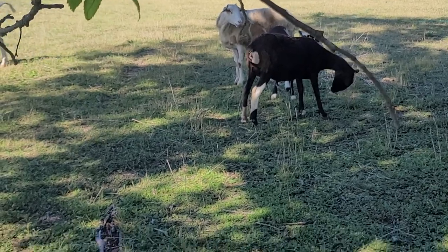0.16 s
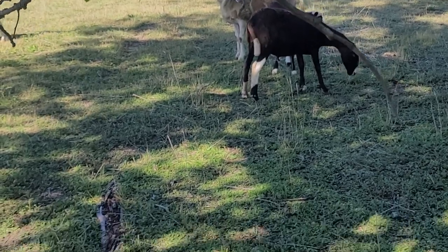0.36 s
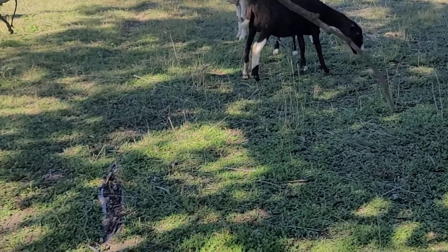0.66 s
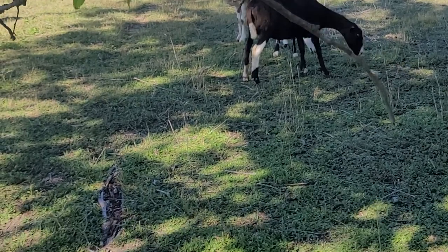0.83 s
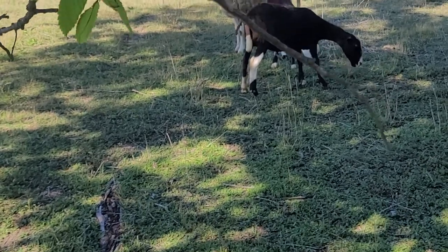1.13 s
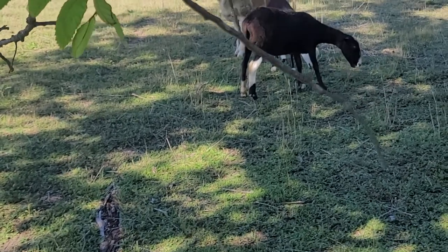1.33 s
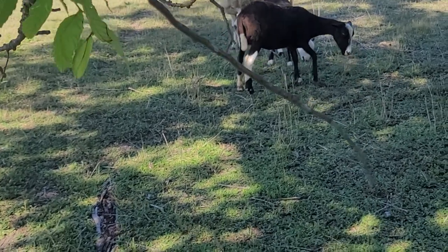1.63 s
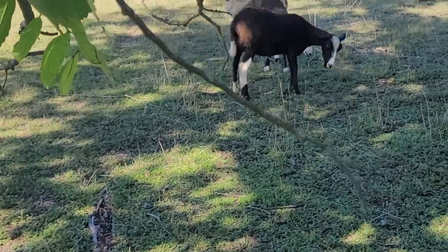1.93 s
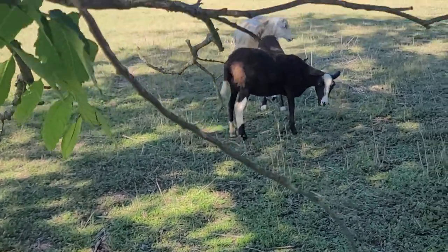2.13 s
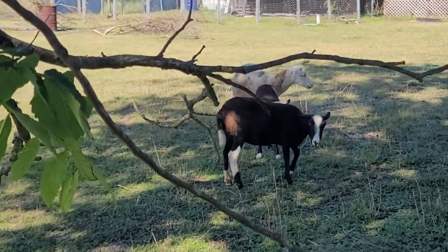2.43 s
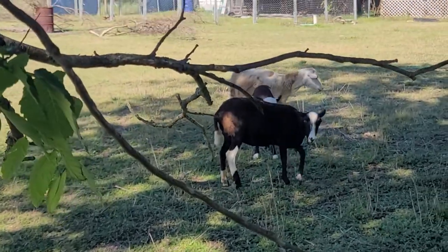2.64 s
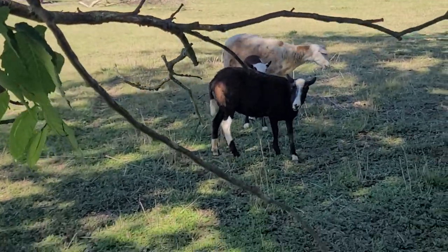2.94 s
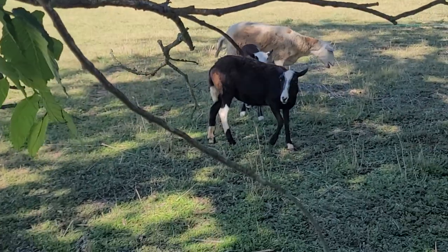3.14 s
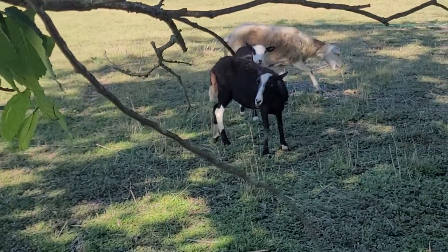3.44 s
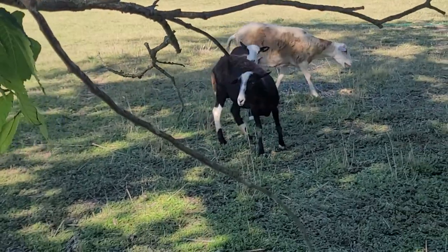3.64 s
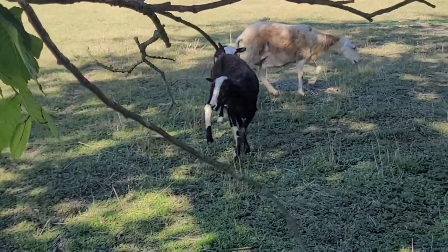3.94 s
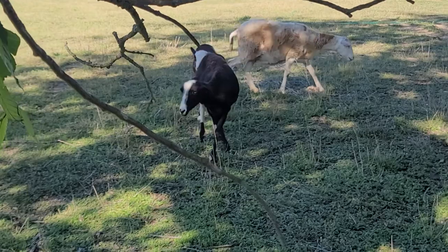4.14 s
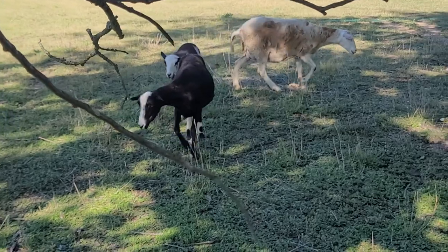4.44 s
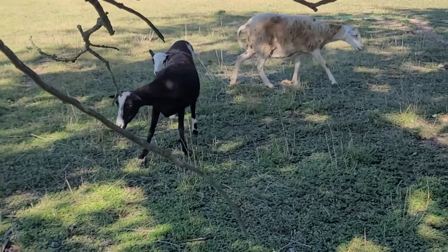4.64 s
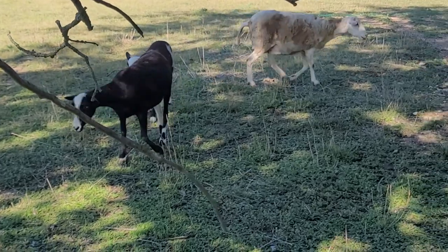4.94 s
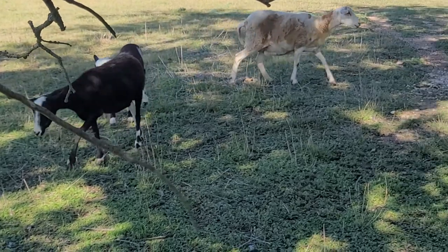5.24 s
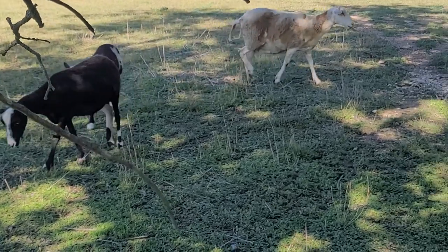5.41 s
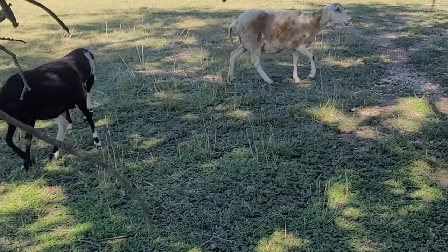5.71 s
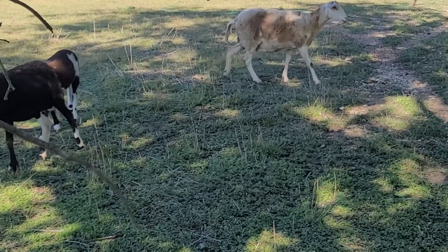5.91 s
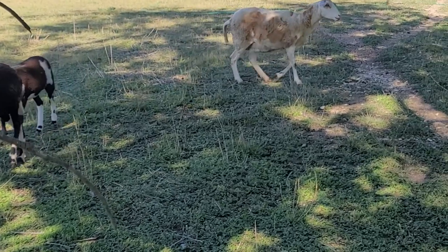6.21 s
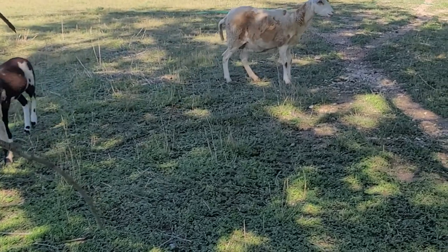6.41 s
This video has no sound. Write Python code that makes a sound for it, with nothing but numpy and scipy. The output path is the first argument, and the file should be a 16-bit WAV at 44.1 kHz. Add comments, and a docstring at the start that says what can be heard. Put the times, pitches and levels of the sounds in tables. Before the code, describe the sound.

An open pasture heard through a handheld stereo microphone: deep wind buffeting, soft far noise and a faint wavering low drone. From 0 to 1.4 s small birds give thin whistles, first a steady one, then a high cluster around 1.0 to 1.4 s. Wind gusts thump briefly, strongest near 2.5 s; a dry stalk snaps at 1.8 s. At 3.2 s a fairly near sheep bleats once until 3.8 s, low, nasal and raspy, quavering nearly twenty times a second, opening brighter, slowing slightly and stopping with airy rasp. Stalks crackle from 3.8 to 5.6 s. From 4.4 s high whistles return, rising and buzzing, mostly left. A far crow caws hoarsely and faintly at 5.4, 5.8 and 6.2 s. From 5.7 to 6.5 s a fast trill of steep falling chirps echoes in trees above growing distant twitter, and a last buzzy whistle ends it.

```python
"""Birds whistle over wind rumble, far noise and a faint drone; dry stalks snap as decaying noise throughout.
At 3.2 s a sheep bleats for 0.65 s: quavering glottal pulses and air ring a throat whose mouth opens.
More gliding-sine whistles follow, a far crow caws hoarsely through one resonance from 5.4 s,
and from 5.7 s a trill of steep downward sweeps echoes in the trees over a growing far chorus."""
import sys
import numpy as np
from scipy import signal
from scipy.fft import rfft, irfft, next_fast_len
from scipy.io import wavfile
from scipy.ndimage import uniform_filter1d, map_coordinates

SR = 44100
rng = np.random.default_rng(int(sys.argv[2]) if len(sys.argv) > 2 else 0)


def wav_record(signal):
    """Record a signal, one row per channel, as 16-bit PCM in the file named by sys.argv[1]."""
    frames = np.transpose(np.atleast_2d(signal))
    bounded = np.clip(frames, -1, 1)
    # unit amplitude maps onto the largest positive 16-bit level
    quanta = np.round(bounded * 32767).astype(np.int16)
    wavfile.write(sys.argv[1], SR, quanta)


N = 289737
T = np.arange(N) / SR
SIZE = 2 * next_fast_len(N // 2 + 1, True)
HZ = np.maximum(np.arange(SIZE // 2 + 1) * SR / SIZE, 1)

BLEAT_START_S, BLEAT_END_S = 3.158, 3.806
SLACK_DB = -27.5  # source level with no effort
CHIRP_S = .04  # call length of far birds


def undb(db):
    """Decibels to gain."""
    return 10 ** (np.asarray(db) / 20)


def unit(x):
    """Scale to rms 1."""
    return x / np.sqrt(np.mean(x ** 2))


def curve(rows):
    """Rows (s, value) joined by straight lines."""
    return np.interp(T, *np.transpose(rows))


def bumps(rows):
    """Sum of Gaussian rises: start of each row is its centre (s, length s, rise)."""
    return sum(rise * np.exp(-((T - at) / length) ** 2) for at, length, rise in rows)


def pan_gains(pan_db):
    """Left and right gains for a left-minus-right level."""
    return undb(np.array([[pan_db], [-pan_db]]) / 2)


def walk(rate_hz):
    """Smooth random signal with a spread near 1."""
    k = int(SR / rate_hz)
    steps = np.repeat(rng.standard_normal(N // k + 1), k)
    return 1.321 * uniform_filter1d(uniform_filter1d(steps, k), k)[:N]


def noise(spectrum, share=1):
    """Noise of rms 1 coloured by (Hz, dB) points, of which a share of the power is kept."""
    hz, db = np.transpose(spectrum)
    gain = undb(np.interp(np.log(HZ), np.log(hz), db, left=-120, right=-120))
    return irfft(rfft(rng.standard_normal(SIZE)) * unit(gain) * np.sqrt(share))[:N]


def resonate(x, modes):
    """Ring resonances (Hz, width Hz, dB); the folded cepstrum makes the response causal."""
    hz = np.linspace(0, SR / 2, 4097)
    gain = sum(undb(db) / (1 + (2 * (hz - centre) / width) ** 2) for centre, width, db in modes)
    cepstrum = irfft(np.log(gain))
    cepstrum[1:len(hz)] *= 2
    cepstrum[len(hz):] = 0
    return signal.oaconvolve(x, irfft(np.exp(rfft(cepstrum))))[:N]


def flex(x, modes, scale):
    """Move all resonances by a changing factor: ring them on a warped clock, then unwarp."""
    clock, samples = np.cumsum(scale), np.arange(N)
    warped = map_coordinates(x, [np.interp(samples, clock, samples)])
    return map_coordinates(resonate(warped, modes), [clock])


def dip(x, notches):
    """Antiresonances (Hz, width Hz, dB) darken the valleys of a sound."""
    for hz, width, db in notches:
        x = x - (1 - undb(db)) * signal.lfilter(*signal.iirpeak(hz, hz / width, fs=SR), x)
    return x


def place(x, pan_db, lag_ms):
    """Two ports: the left one hears the sound lag_ms later."""
    left = np.roll(x, int(round(lag_ms * SR / 1000)))
    return np.array([left, x]) * pan_gains(pan_db)


def scatter(x, t60_s):
    """Diffuse echoes from grass, trunks and leaves: decaying noise, different at each port."""
    t = T[:SR]
    tail = rng.standard_normal((2, SR)) * undb(-60 * t / t60_s) * (1 - np.exp(-t / .004))
    tail /= np.sqrt(np.sum(tail ** 2) / 2)
    return signal.fftconvolve(np.atleast_2d(x), tail, axes=1)[:, :N]


def glide(hz):
    """A sine that follows a pitch, swelling and fading over its length."""
    return np.sin(2 * np.pi * np.cumsum(hz) / SR) * np.hanning(len(hz)) ** .45


def quaver():
    """Pitch, level and throb of the bleat: pitch and level follow effort and surge at each throb."""
    # push behind the bleat: time_s, effort_0_to_1, quaver_depth_0_to_1
    push = [(3.16, .35, .2), (3.195, .45, .4), (3.225, .66, 1), (3.28, .75, .75), (3.38, .92, 1),
            (3.45, .9, .6), (3.53, 1, .15), (3.6, .8, .3), (3.68, .4, 1), (3.77, .4, 1), (3.806, 0, .6)]
    slack_hz, push_hz, push_db = 130.94, 30.72, 12  # pitch without effort; what full effort adds
    fresh_per_s, tired_per_s = 19.7, 14.6  # throbs a second
    crest_s, tires_s = 3.222, 3.626  # first full throb; moment the quaver slows
    swing_share, swing_db, sharpness = .12, 2.9, 2.5  # swings at full depth
    attack_s, attack_db, release_s, release_db = .008, 6, .024, 9
    times, effort, depth = np.transpose(push)
    effort, depth = np.interp(T, times, effort), np.interp(T, times, depth)

    turns = fresh_per_s * (np.minimum(T, tires_s) - crest_s) + tired_per_s * np.maximum(T - tires_s, 0)
    surge = 2 * np.abs(np.cos(np.pi * turns)) ** sharpness - 1
    throb = surge * np.clip((T - BLEAT_START_S) / (crest_s - BLEAT_START_S), 0, 1)
    hz = (slack_hz + push_hz * effort) * (1 + swing_share * (1 + depth) / 2 * throb)
    starting = np.clip(1 - (T - BLEAT_START_S) / attack_s, 0, 1)
    fading = np.clip(1 - (BLEAT_END_S - T) / release_s, 0, 1)
    db = SLACK_DB + push_db * effort + swing_db * depth * throb
    return hz, db - attack_db * starting - release_db * fading, throb


def glottis(hz, db, sounding, soft_hz=3800):
    """Uneven vocal-fold pulses, each followed by a decaying puff of air; returns source and puffs."""
    jitter_share, shimmer_db, rasp_db = .022, 1.1, -16
    cycles = np.cumsum(hz * (1 + jitter_share * walk(150)) * sounding) / SR
    beats = np.interp(np.arange(int(cycles[-1]) + 1) + 1e-6, cycles, np.arange(N))
    sizes = undb(shimmer_db * rng.standard_normal(len(beats)))
    pulses = np.zeros(N)
    for at, size in zip(beats, sizes):
        near = int(at) + np.arange(-8, 9)  # windowed sinc places the pulse between samples
        pulses[near] += size * np.sinc(near - at) * np.hanning(len(near))
    pulses *= np.sqrt(SR / np.mean(hz))
    puffs = np.exp(-(cycles % 1) / .6) * sounding
    rasp = undb(rasp_db) * 2 * puffs * rng.standard_normal(N)
    # soft fold closure leaves the top octaves to turbulence
    lowpass = signal.butter(2, soft_hz, fs=SR, output="sos")
    return signal.sosfilt(lowpass, (pulses + rasp) * undb(db)), puffs


def throat(source, mouth, throb, sounding, voice_db=15):
    """Throat and muzzle resonances crossfade from shut to open mouth and move with each throb."""
    # resonances, mouth nearly shut and wide open: centre_hz, width_hz, rel_db
    shut_modes = [(486, 110, -27), (705, 310, -43), (1406, 54, -16), (1630, 150, -14), (1855, 147, 0.5),
                  (2120, 100, -7), (2164, 66, 3.5), (2980, 450, -16.5), (3650, 120, -11),
                  (5900, 2000, -25.5)]
    open_modes = [(486, 82, -18), (671, 126, -12), (754.3, 36, -11.5), (1724, 81, -13.5), (1835, 114, -6.5),
                  (2010, 64, -17), (2220, 176, -3.5), (2366, 98, -4), (2610, 90, -16), (2753, 212, -8),
                  (3087, 78, -13), (5900, 420, -32.5)]
    # valleys of the open mouth: centre_hz, width_hz, gain_db
    valleys = [(1080, 210, -4), (1470, 200, -7), (4400, 910, -9)]
    # nasal resonances until the lips part: centre_hz, width_hz, rel_db
    nose_modes = [(1980, 400, 4), (3680, 390, 1), (6000, 1500, -3)]
    swing_share, wander_share = .011, .011
    rise_share, rise_s, lips_part_s = .035, .06, .043  # resonances start low and settle
    slack = rise_share * np.exp(-np.abs(T - BLEAT_START_S) / rise_s)
    scale = 1 + (swing_share * throb + wander_share * walk(110) - slack) * sounding
    shut = flex(source * (1 - mouth), shut_modes, scale)
    opened = dip(flex(source * mouth, open_modes, scale), valleys)
    voice = undb(voice_db) * (shut + opened)
    parted = np.clip((T - BLEAT_START_S) / lips_part_s, 0, 1) ** 2
    return voice * parted + resonate(voice * (1 - parted), nose_modes)


def teeth_hiss(puffs, db, mouth, hiss_db=-54, open_db=6):
    """Air hisses past the teeth once a cycle, more as the mouth opens and as rasp breaks through."""
    # hiss colour: freq_hz, rel_db
    teeth = [(3000, 7), (3900, -7), (4900, -8.5), (5600, 1.5), (6800, -4), (7700, -12), (9200, -22),
             (10200, -15.5), (11200, -26), (15500, -26)]
    # rasp on some throbs: centre_s, length_s, rise_db
    rasps = [(3.228, 0.0098, 5), (3.328, .01, 0), (3.442, .008, 1), (3.565, 0.025, 4), (3.797, .022, 9.5)]
    puff_sharpness, flicker_db = .5, 1.6
    follow_db_per_db = .63  # hiss rise per dB of voice
    flicker = undb(flicker_db * (walk(70) + walk(600)))
    turbulence = np.array([noise(teeth), 1.2 * noise(teeth)]) * flicker
    level_db = follow_db_per_db * (db - SLACK_DB) + hiss_db + open_db * mouth + bumps(rasps)
    return turbulence * puffs ** puff_sharpness * undb(level_db)


def sheep(ground_db=-8, ground_ms=1.93, near_db=-9, echo_db=-24, echo_t60_s=.5):
    """Glottal pulses ring the throat as the mouth opens; turf inverts and returns the voice."""
    # jaw: time_s, opening_0_to_1
    jaw = [(3.16, 0.56), (3.225, 0.41), (3.28, 0.63), (3.37, 0.76), (3.45, 0.83), (3.55, 0.82),
           (3.63, 0.84), (3.7, 0.83), (3.78, 0.71)]
    hz, db, throb = quaver()
    sounding = (T > BLEAT_START_S) & (T < BLEAT_END_S)
    mouth = np.clip(curve(jaw), 0, 1)
    source, puffs = glottis(hz, db, sounding)
    voice = place(throat(source, mouth, throb, sounding), -1.2, .045)
    # soft turf swallows the hiss
    voice = voice - undb(ground_db) * np.roll(voice, int(ground_ms * SR / 1000), axis=1)
    voice = voice + teeth_hiss(puffs, db, mouth)
    return voice + undb(near_db) * scatter(voice, .17) + undb(echo_db) * scatter(voice, echo_t60_s)


def trill(bough_ms=12, bough_t60_s=.092, bough_db=-10, echo_db=-13, echo_t60_s=.95, pan_db=-7.5):
    """A rising pip and a steep downward sweep, about twelve times a second, slowing; trees echo it."""
    # syllables: crest_s, rel_db
    syllables = [(5.679, -32.5), (5.764, -35.5), (5.847, -35), (5.93, -33), (6.017, -33.5), (6.103, -35.5),
                 (6.188, -34.5), (6.275, -37), (6.361, -35.5), (6.453, -35.5)]
    # one falling syllable: time_from_crest_s, pitch_hz, rel_db
    fall = [(-.015, 6500, -24), (-.011, 5850, -6), (-.006, 5340, -7), (0, 5070, 0), (.004, 4850, -2),
            (.008, 4480, -19), (.016, 3950, -15), (.023, 3750, -26)]
    detune_share, steepness_share, flutter_db = .008, .11, 1.8  # random spreads
    pip_hz, pip_rise_share, pip_s, pip_lead_s, pip_db = 3370, .07, .009, .038, -51
    echo_evenness = .5  # power that flattens the swell sent to the trees
    song, spread = np.zeros(N), np.zeros(N)
    ages, pitches, levels = np.transpose(fall)
    age = np.arange(ages[0], ages[-1], 1 / SR)
    sweep_hz, swell = np.interp(age, ages, pitches), undb(np.interp(age, ages, levels))
    crest_hz = np.interp(0, ages, pitches)
    pip_slope = pip_rise_share * np.linspace(-.5, .5, int(pip_s * SR))
    chances = rng.standard_normal((len(syllables), 4))
    for (crest_s, db), (detune, steep, pip_pitch, pip_size) in zip(syllables, chances):
        hz = crest_hz * (1 + detune_share * detune)
        hz = hz + (sweep_hz - crest_hz) * (1 + steepness_share * steep)
        tone = glide(hz) * undb(db)
        pip = glide(pip_hz * (1 + 2 * detune_share * pip_pitch + pip_slope))
        at, pip_at = int((crest_s + ages[0]) * SR), int((crest_s - pip_lead_s) * SR)
        song[at:at + len(hz)] += tone * swell
        spread[at:at + len(hz)] += tone * swell ** echo_evenness
        song[pip_at:pip_at + len(pip)] += pip * undb(pip_db + pip_size)
    direct = place(song * undb(flutter_db * walk(250)), pan_db, .023)
    # nearby boughs blur each sweep; farther trees leave a haze over its range
    spread = place(spread, pan_db / 2, 0)
    boughs = np.roll(scatter(spread, bough_t60_s), int(bough_ms * SR / 1000), axis=1)
    return direct + undb(bough_db) * boughs + undb(echo_db) * scatter(spread, echo_t60_s)


def whistles(echo_db=-3.5, buzz_hz=260, waver_db=1.8, settle_power=2.26):
    """Near-sine notes glide fast, then settle; a fast flutter of the pitch turns some into buzzes."""
    # notes: start_s, length_s, first_hz, last_hz, rel_db, buzz_depth_hz, left_minus_right_db
    notes = [(0, .15, 2690, 2647, -54.5, 14, -10.5), (.408, 0.024, 3970, 4010, -67, 15, -6),
             (0.591, 0.037, 3040, 3100, -60.5, 70, -3), (.95, 0.022, 2550, 2650, -63, 20, -5),
             (1.036, 0.028, 3190, 3020, -56.5, 44, -3), (1.028, 0.15, 4750, 4395, -53.5, 44, -5),
             (1.18, 0.056, 2830, 2680, -63, 34, -1), (1.227, 0.039, 4660, 4350, -55, 30, -3),
             (1.255, 0.045, 4600, 4250, -50, 36, -3), (1.28, 0.068, 4310, 4450, -52, 20, -1),
             (1.341, 0.053, 4460, 4204, -52, 72, -3), (4.36, 0.15, 4880, 4430, -57, 81, -5),
             (4.469, 0.43, 4450, 4520, -60.5, 88, -3), (4.441, 0.073, 5480, 6270, -47, 55, -11),
             (4.763, 0.078, 5470, 6280, -46, 55, -9), (4.992, 0.13, 3415, 3314, -44.5, 36, -3),
             (5.02, 0.033, 2460, 2720, -52.5, 33, -4), (5.231, 0.21, 5560, 5680, -51, 200, -7.5),
             (5.25, 0.14, 6850, 6950, -65, 120, -8), (5.365, 0.08, 5180, 5150, -58, 76, -7),
             (5.461, 0.12, 4160, 4400, -48, 11, -9), (5.58, 0.07, 4380, 4300, -62, 25, -6),
             (6.523, 0.28, 4400, 4450, -47.5, 78, -7)]
    out = np.zeros((2, N))
    buzz = np.sin(2 * np.pi * np.cumsum(buzz_hz * (1 + .3 * walk(200))) / SR)
    flutter = buzz + .4 * walk(1500) + .35 * walk(90)
    waver = undb(waver_db * walk(60))
    for start, length, first, last, db, depth, pan_db in notes:
        span = (T > start) & (T < start + length)
        remaining = 1 - (T[span] - start) / length
        hz = last + (first - last) * remaining ** settle_power + depth * flutter[span]
        out[:, span] += np.sqrt(2) * glide(hz) * waver[span] * undb(db) * pan_gains(pan_db)
    return out + undb(echo_db) * scatter(out, .58)


def crow(pitch_hz=470, length_s=.044):
    """Hoarse caws: jittered harmonics, of which distance leaves only the strongest resonance."""
    # caws: start_s, rel_db
    caws = [(5.415, -48.5), (5.79, -54), (6.22, -50)]
    phase = 2 * np.pi * np.cumsum(pitch_hz * (1 + .0287 * walk(200))) / SR
    harmonics = sum(np.cos(k * phase) for k in range(1, 6))
    voice = unit(resonate(harmonics, [(1470, 430, 0)]))
    calls = sum(undb(db) * np.sin(np.pi * np.clip((T - at) / length_s, 0, 1)) for at, db in caws)
    return scatter(voice * calls, .16)


def stalks(rustle_db=-15, snap_db=-5, grass_db=-79):
    """Dry stalks snap and rustle under hooves as decaying noise, over a thin stir of grass."""
    # snaps: start_s, rel_peak_db, left_minus_right_db
    snaps = [(0.3729, -51, -4), (1.7622, -42, -4), (1.782, -54, -6), (3.8337, -50, -2), (4.4292, -47, -2),
             (4.5795, -45, -3), (4.724, -51, -2), (4.8188, -44, 0), (4.957, -55, -2), (5.143, -54, -2),
             (5.5791, -48, -2)]
    # snapping straw colour: freq_hz, rel_db
    straw = [(1500, -14), (4500, 10), (7000, 16), (9000, 1.5), (12000, 4), (16000, -13)]
    faint_per_s, faint_db, spread_db = 5, -61, 4  # fainter snaps; spread of level and pan
    grain, out = np.array([noise(straw), noise(straw)]), np.zeros((2, N))
    faint = []
    for when, size, side in rng.random((int(faint_per_s * N / SR), 3)):
        level_db = faint_db + spread_db * (2 * size - 1)
        faint.append((when * N / SR, level_db, spread_db * (2 * side - 1)))
    for at, db, pan_db in list(snaps) + faint:
        span = (T > at) & (T < at + .2)
        age = T[span] - at
        fade = np.exp(-age / .004) + undb(rustle_db) * np.exp(-age / .025)
        out[:, span] += grain[:, span] * fade * undb(db + snap_db) * pan_gains(pan_db)
    stir_db = 3.5 * walk(12) + 4 * walk(250)
    return out + grain * undb(grass_db + stir_db)


def chirps(per_s=2, pitch_hz=2750, level_db=-64, spread=.016, bend=.013, t60_s=.25):
    """Far birds chirp at random, each call sliding up or down a little."""
    out, size = np.zeros(N), int(CHIRP_S * SR)
    for when, pitch, slope in rng.random((int(per_s * N / SR), 3)):
        at = int(when * (N - size))
        slide = bend * (2 * slope - 1) * np.linspace(0, 1, size)
        out[at:at + size] += glide(pitch_hz * (1 + spread * (2 * pitch - 1) + slide))
    return undb(level_db) * scatter(out, t60_s)


def chorus(per_s=30, low_hz=2188, high_hz=3440, bend=.148, t60_s=.47):
    """Many birds twitter in the far trees, blurred by distance and growing louder."""
    # chorus loudness: time_s, level_db
    loudness = [(0, -82), (4.1, -65), (5.2, -62.5), (6.5, -62)]
    out, size = np.zeros(N), int(CHIRP_S * SR)
    for when, pitch, slope in rng.random((int(per_s * N / SR), 3)):
        at = int(when * (N - size))
        hz = low_hz + (high_hz - low_hz) * pitch
        out[at:at + size] += glide(hz * (1 + bend * (2 * slope - 1) * np.linspace(-.5, .5, size)))
    return unit(scatter(out, t60_s)) * undb(curve(loudness))


def wind(wind_db=-42, own_db=3, pan_db=-3, eddy_db=2.0, eddies_per_s=12):
    """Eddies buffet the two ports, partly together and partly each alone; gusts swell and die away."""
    # gusts: centre_s, length_s, rise_db
    gusts = [(0.072, 0.019, 7), (0.448, 0.068, 12.5), (0.773, 0.033, 8), (1.194, 0.037, 11.5),
             (1.613, 0.31, 6.5), (2.071, 0.039, 13), (2.24, 0.16, 4), (2.483, 0.046, 21), (5.38, 0.21, 3.5)]
    # buffeting colour: freq_hz, rel_db
    buffet = [(11, -47), (18, -18), (59, 2.5), (77, 0.5), (130, -19), (170, -34), (290, -120)]
    db = eddy_db * walk(eddies_per_s) + bumps(gusts)
    own = np.array([noise(buffet), noise(buffet)]) * pan_gains(pan_db)
    return (place(noise(buffet), pan_db, .34) + undb(own_db) * own) * undb(db + wind_db)


def pasture(air_db=-39.5, air_rise_db_per_s=.5038, drone_db=-4, drone_rise_db_per_s=.83, pan_db=-2):
    """Far noise, mostly shared by the ports in the bass and diffuse in the treble; a wavering drone."""
    # far noise colour: freq_hz, rel_db
    air_colour = [(60, -22), (100, -3), (180, -8), (225, -16), (320, -21), (450, -22.3), (740, -21.3),
                  (970, -28.5), (2090, -39.5), (2750, -41.8), (3800, -48), (6600, -49), (8300, -62),
                  (15500, -66)]
    # power arriving from all around: freq_hz, share_0_to_1
    diffuse = [(150, .22), (700, .08), (1500, .62), (4000, 1), (9000, .95)]
    # drone partials: freq_hz, rel_db
    partials = [(70, -37.5), (131, -48), (158, -47.5), (235, -60.5)]
    hz, share = np.transpose(diffuse)
    share = np.clip(np.interp(np.log(HZ), np.log(hz), share), 0, 1)
    around = np.array([noise(air_colour, share), noise(air_colour, share)])
    air = place(noise(air_colour, 1 - share), pan_db, .34) + 1.3 * around
    air = air * undb(air_db + air_rise_db_per_s * T + .6 * walk(6))
    drone = np.zeros(N)
    for hz, db in partials:
        level = undb(db + 1.1 * walk(3.2))
        drone += level * np.sin(2 * np.pi * np.cumsum(hz * (1 + .0112 * walk(9.8))) / SR)
    return air + undb(drone_db + drone_rise_db_per_s * T) * place(drone, pan_db, .34)


def scene():
    """Everything in the pasture."""
    animals = sheep() + trill() + whistles() + crow() + chirps() + chorus()
    return animals + stalks() + wind() + pasture()


def record(dry, top_hz=15850):
    """The recorder cuts the top with a steep lowpass."""
    return signal.sosfilt(signal.ellip(10, .2, 80, top_hz, fs=SR, output="sos"), dry)


dry = scene()
out = record(dry)
wav_record(out)
```